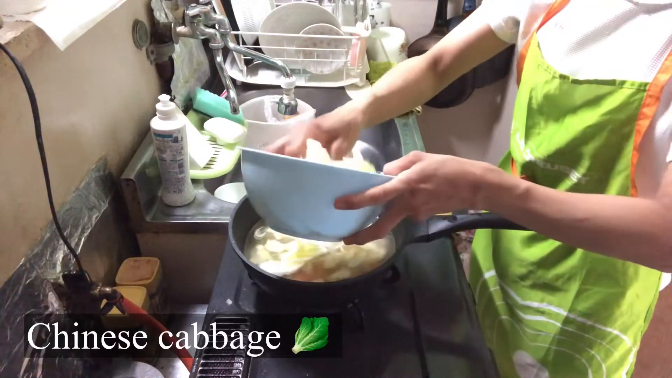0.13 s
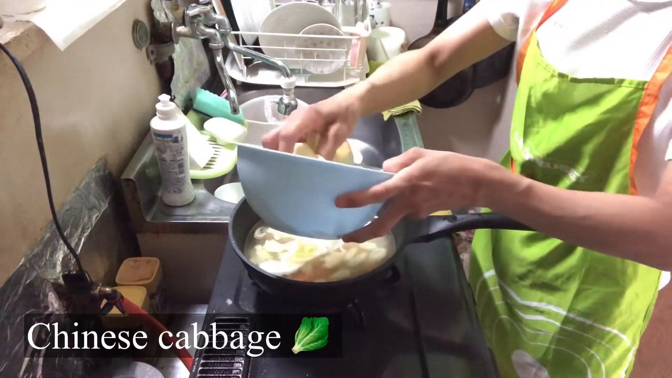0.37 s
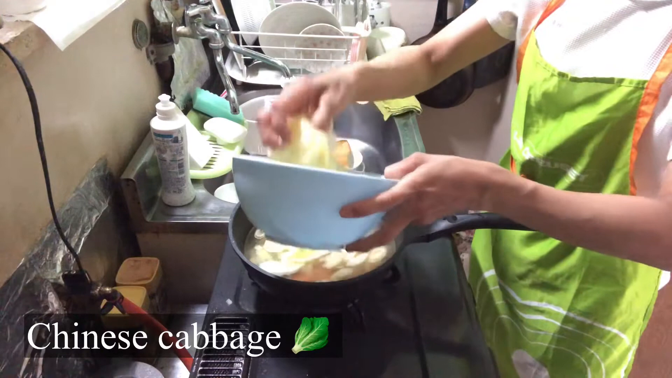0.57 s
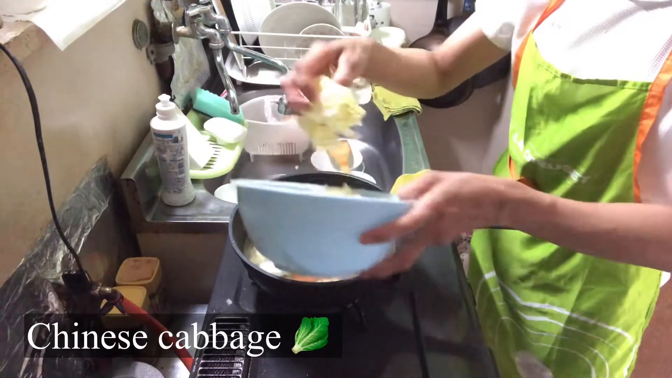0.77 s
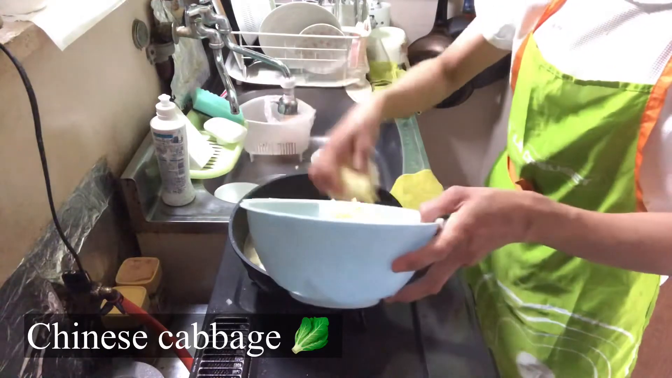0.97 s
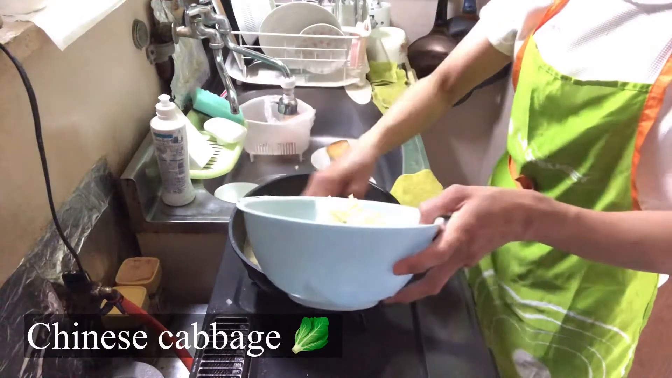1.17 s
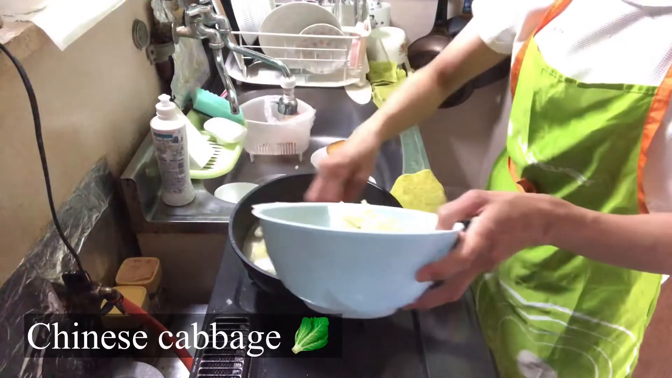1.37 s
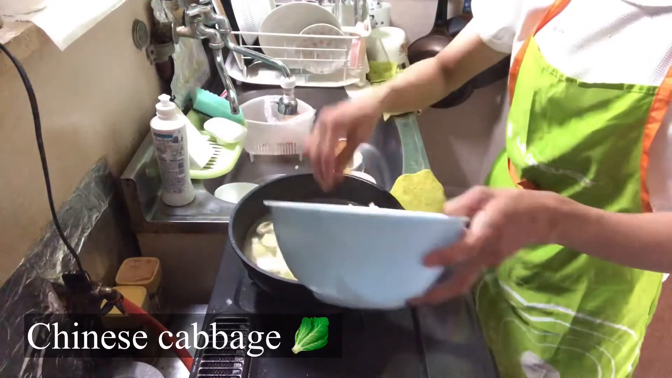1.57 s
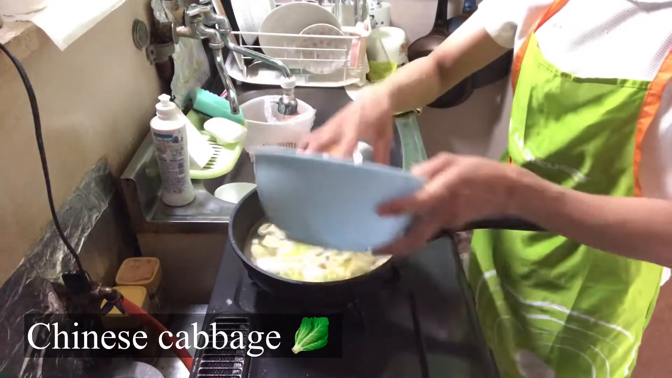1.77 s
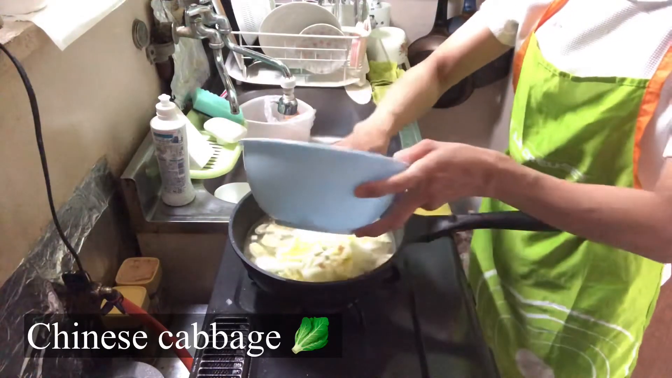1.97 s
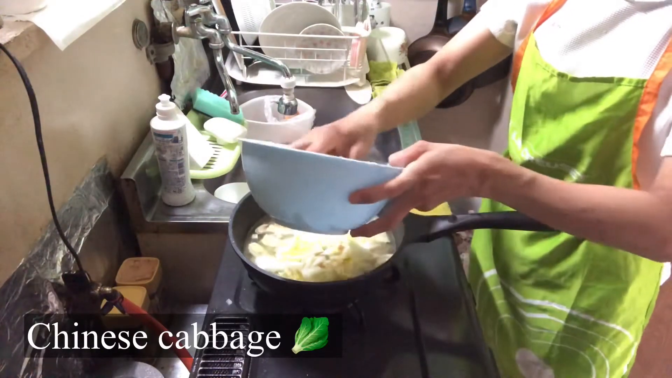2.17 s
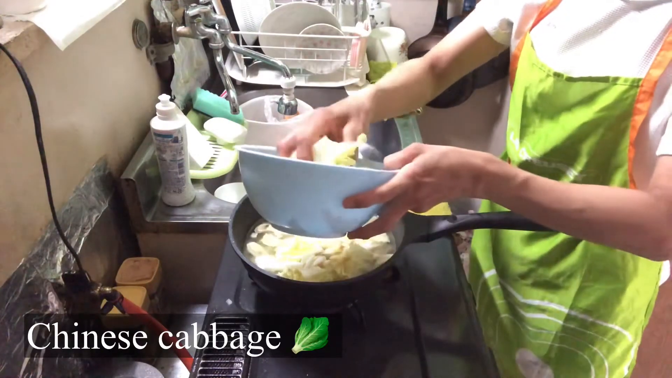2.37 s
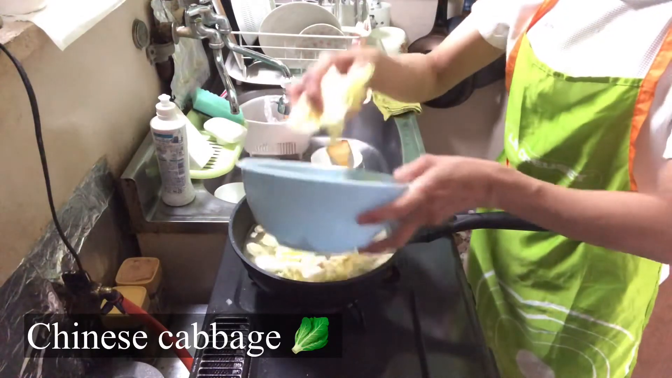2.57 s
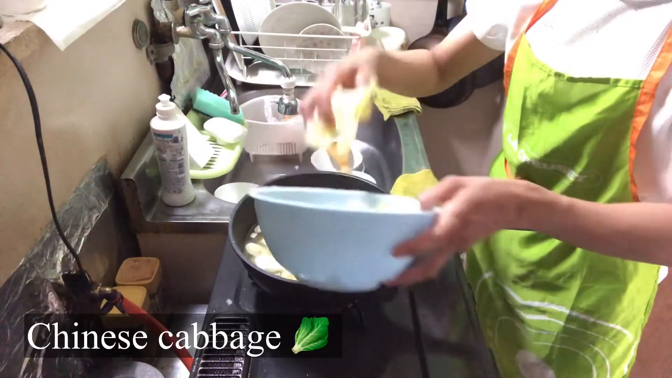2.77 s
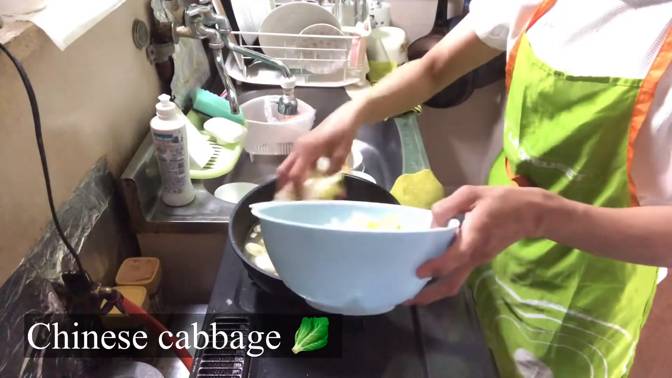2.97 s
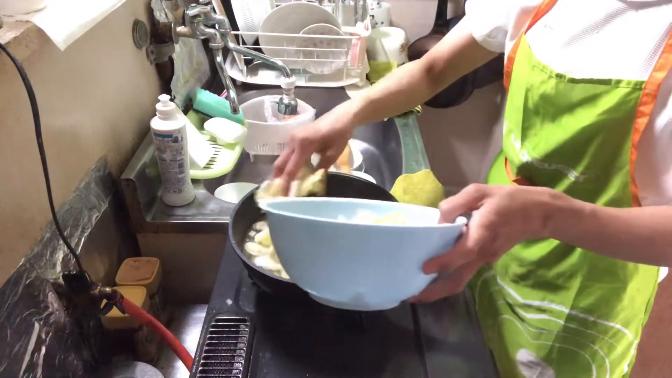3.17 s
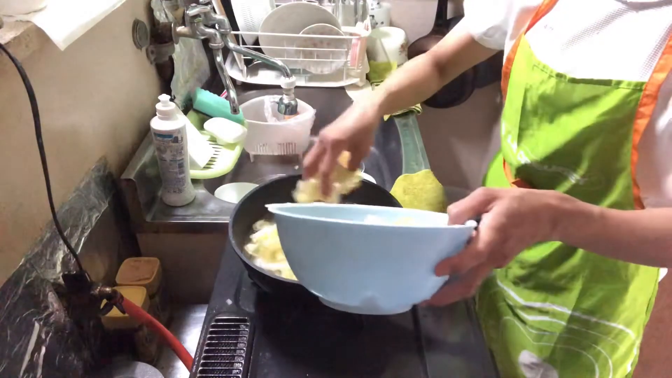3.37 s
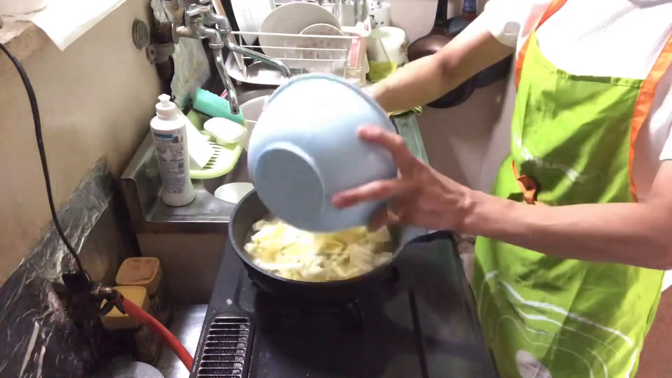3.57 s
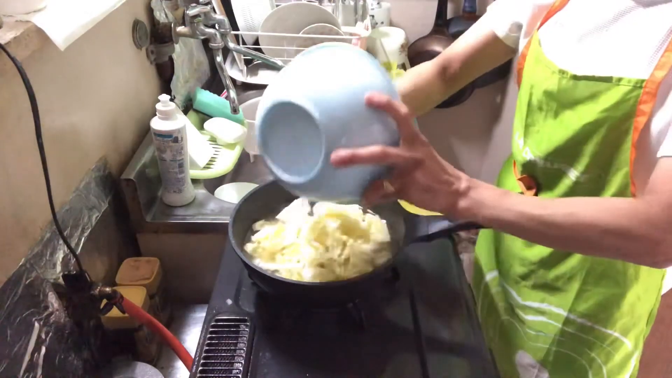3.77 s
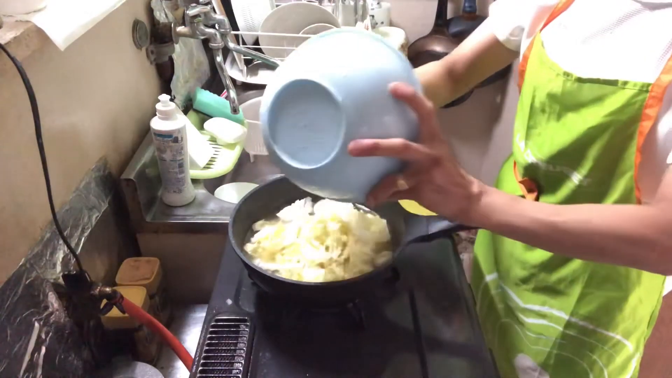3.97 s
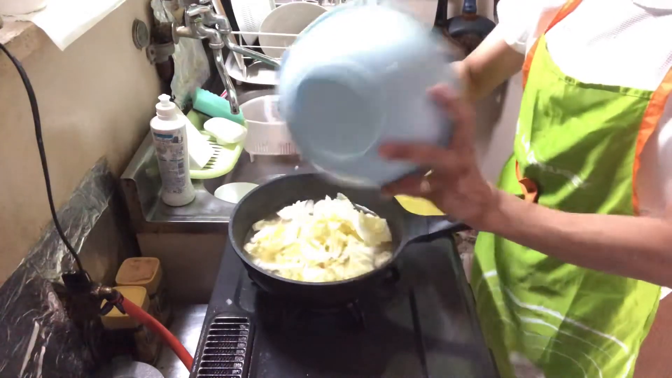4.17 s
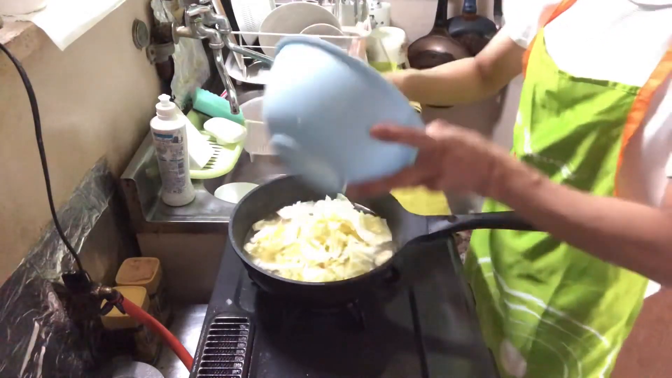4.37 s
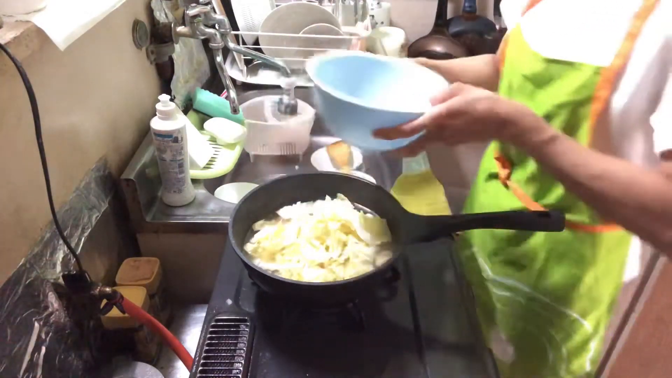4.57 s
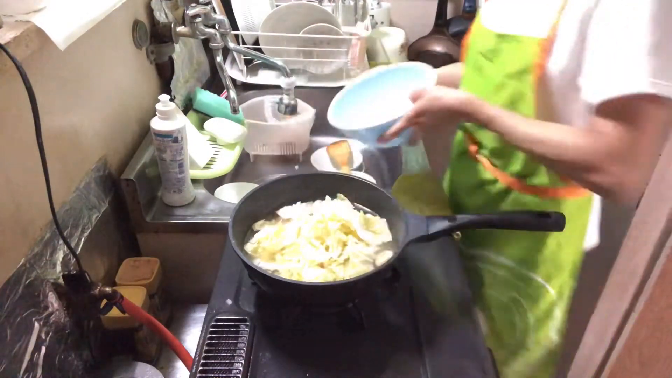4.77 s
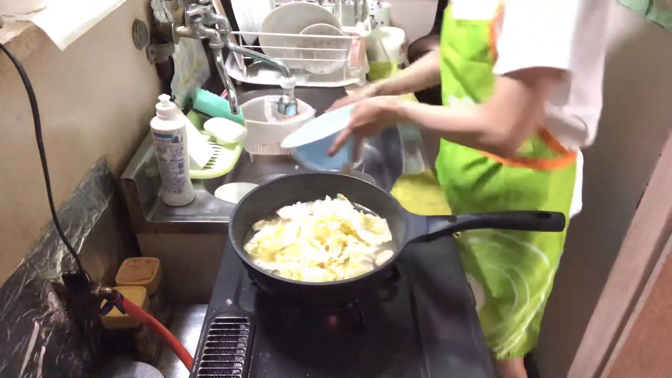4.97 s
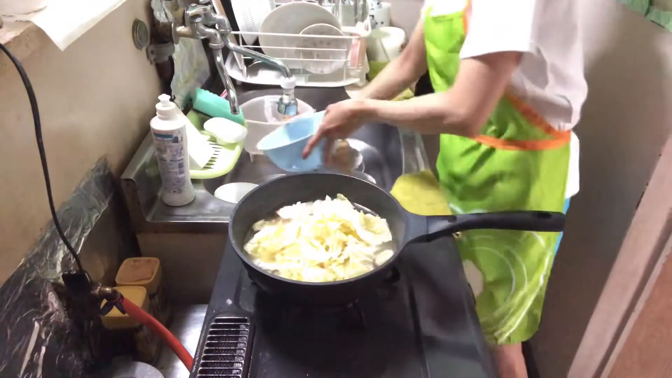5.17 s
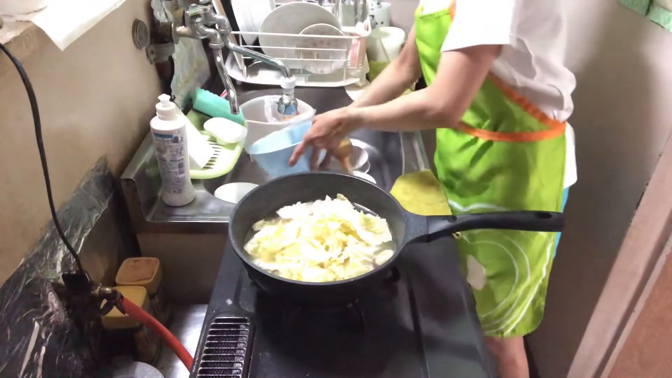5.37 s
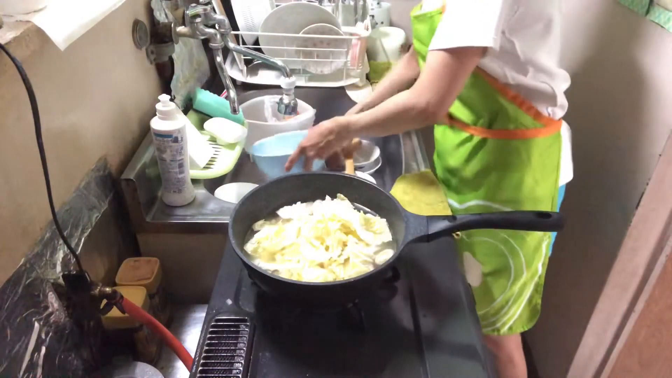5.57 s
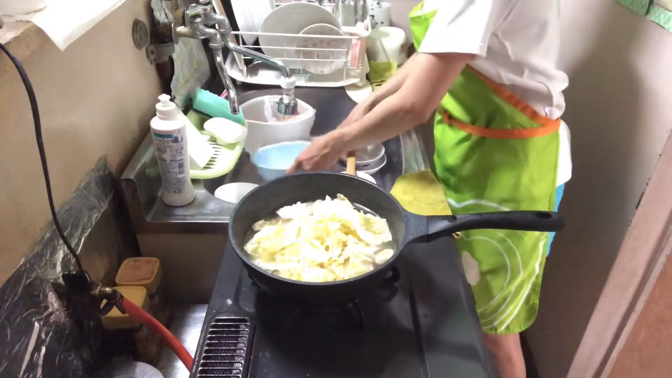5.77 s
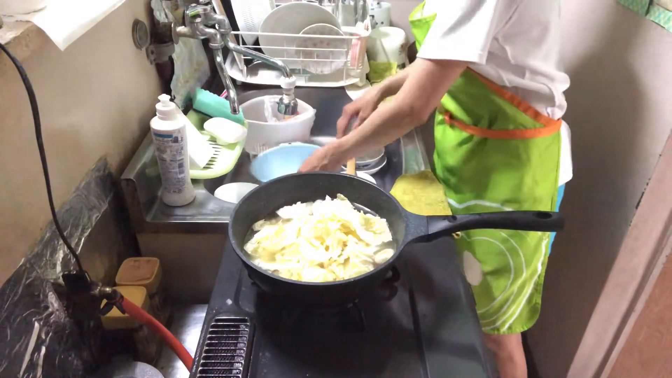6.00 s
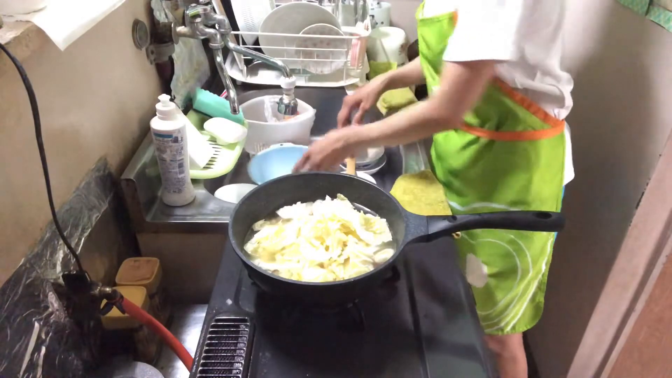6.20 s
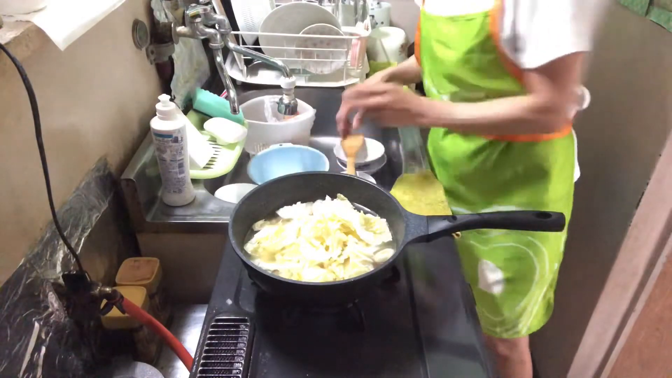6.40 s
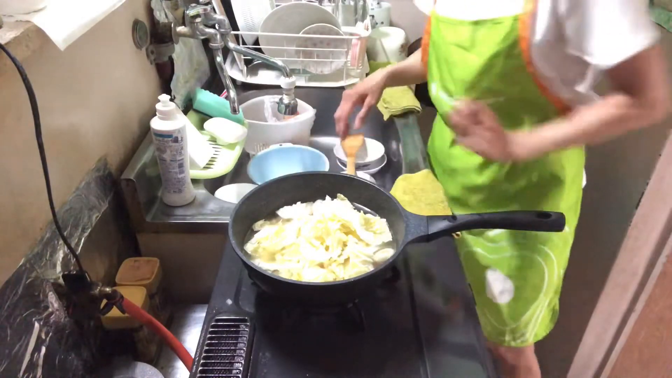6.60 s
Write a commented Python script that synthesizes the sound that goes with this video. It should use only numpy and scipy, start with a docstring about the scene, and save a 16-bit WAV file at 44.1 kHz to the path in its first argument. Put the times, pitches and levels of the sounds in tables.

```python
"""A hand moves chopped cabbage from a plastic bowl into a pan under a droning cooker hood.
Throughout, the hood is shaped noise and a wavering tone; the leaves are gritty noise grains and snaps,
with hollow modal taps on the bowl. At 3.6 s all sound drops out briefly and fades back in.
Then a glazed dish clinks as damped modes, the bowl slides as rough noise and is knocked down
into a steel sink, whose modes boom and rattle until they are stilled."""
import sys
import numpy as np
from scipy import signal
from scipy.fft import rfft, irfft
from scipy.io import wavfile
from scipy.ndimage import uniform_filter1d

SR = 44100
rng = np.random.default_rng(int(sys.argv[2]) if len(sys.argv) > 2 else 0)


def to_wav(sig):
    """Store sig (one row per channel, or 1-D mono) as 16-bit WAV at the path in sys.argv[1].

    Samples outside -1..1 are clipped; the rate is SR.
    """
    pcm = np.clip(np.atleast_2d(sig), -1, 1) * 32767
    pcm = np.round(pcm).astype(np.int16)
    wavfile.write(sys.argv[1], SR, pcm.T)  # frames by channels


N = 292824


def amp(db):
    """Level to amplitude: 20 dB is a factor of ten."""
    return 10 ** (np.asarray(db) / 20)


def evened(x):
    """Normalisation to unit rms."""
    return x / np.sqrt(np.mean(x ** 2) + 1e-20)


def read(points, hz):
    """Interpolation of a curve along logarithmic frequency."""
    f, value = np.transpose(points)
    return np.interp(np.log(hz + 1), np.log(f + 1), value)


def add(mix, s, sound):
    """Superposition of a sound on the mix from time s."""
    part = mix[round(s * SR):][:len(sound)]
    part += sound[:len(part)]


def coloured(x, points):
    """Spectral shaping: x filtered by a gain curve, to unit rms."""
    gain = amp(read(points, np.fft.rfftfreq(len(x), 1 / SR)))
    return evened(irfft(rfft(x) * gain, len(x)))


def band(x, hz, width):
    """Resonance: a band-pass peak applied twice."""
    b, a = signal.iirpeak(min(hz, .45 * SR), hz / width, SR)
    return signal.lfilter(b, a, signal.lfilter(b, a, x))


def gritty(count, per_s, spread_db, smooth):
    """Shot noise: sparse clicks of unequal size over a share of smooth noise."""
    size = amp(spread_db * np.minimum(rng.exponential(1, count), 4)) * rng.standard_normal(count)
    clicks = size * (rng.random(count) < per_s / SR)
    return evened(clicks) + smooth * rng.standard_normal(count)


def strokes(rows, rise_db, fall_db):
    """Exponential envelopes, summed: each rises, holds and falls at so many dB a second."""
    t = np.arange(N) / SR
    total = 0
    for s, hold, db in rows:
        before = np.maximum(s - t, 0)
        after = np.maximum(t - s - hold, 0)
        total = total + amp(db - rise_db * before - fall_db * after)
    return total


SPOT_DB, SPOT_OCTAVES = 8, 0.24  # lift of the modes near the favoured pitch of the place struck


def ring(modes, hardness_db, scatter_db, chatter_s, spot_hz=None, firm=5.7, detune=0.012):
    """Modal superposition: one blow sets off damped sines, the high ones weakly if it is soft."""
    hz, db, t60 = np.transpose(modes)[:, :, None]
    t = np.arange(SR // 2) / SR
    spot = rng.standard_normal((len(modes), 1))  # each blow lands on another spot
    lift_db = 0
    if spot_hz is not None:
        lift_db = SPOT_DB * np.exp(-(np.log2(hz / spot_hz) / SPOT_OCTAVES) ** 2)
    level_db = db + lift_db + hardness_db * np.log2(np.maximum(hz, 210.)) + scatter_db * spot
    swell = 1 - np.exp(-t * hz / 0.39)  # low modes swell slowly
    bent_hz = hz * (1 + detune * rng.standard_normal(hz.shape))
    tones = np.sin(2 * np.pi * bent_hz * t + 0.73 * spot)
    out = (swell * amp(level_db - 60 * t / t60) * tones).sum(0)
    bounces = rng.random(800) ** 8 * np.exp(-t[:800] / chatter_s)  # the contact chatters for a moment
    contact = np.diff(bounces, prepend=0) + firm * signal.unit_impulse(800)
    out = signal.oaconvolve(out, contact)[:len(t)]
    return out / abs(out).max()


# the hand grips, drops and spreads wet leaves: [start t/s, hold t/s, nominal level/dB, treble share/dB]
HAND_GRIPS = [(0, 0.15, -62.5, -7), (0.263, 0.023, -57, -6), (0.386, 0.018, -57.5, -2),
              (0.482, 0.13, -62, -5), (1.117, 0.07, -59, -2.5), (1.25, 0.051, -56, -2.5),
              (1.378, 0.012, -60.5, 3), (1.487, 0.076, -63, -2), (1.887, 0.072, -53.5, -7.5),
              (2.013, 0.053, -49.5, -5.5), (2.122, 0.076, -62, -2), (2.743, 0.056, -65.5, -10),
              (2.929, 0.16, -61, 1.5), (3.142, 0.053, -62, -5), (3.48, 0.017, -60, -4),
              (3.676, 0.02, -56, -1), (3.815, 0.084, -61, -4), (4, 0.012, -61.5, -7),
              (4.843, 0.009, -60, -4)]
GRIP_RISE_DB_PER_S, GRIP_FALL_DB_PER_S = 455, 175
# spectral weighting of the leaf grains: [f/Hz, gain/dB]
LEAF_COLOUR = [(880, -34), (1500, -7), (2130, -6.5), (3660, -2), (5420, -2), (8500, -7.5), (11000, -45)]


def leaves():
    """Granular friction: pitched grains in eight bands, with a fizz of noise above."""
    body_rows = [(s, hold, db) for s, hold, db, _ in HAND_GRIPS]
    treble_rows = [(s, hold, db + share) for s, hold, db, share in HAND_GRIPS]
    body = strokes(body_rows, GRIP_RISE_DB_PER_S, GRIP_FALL_DB_PER_S)
    treble = strokes(treble_rows, GRIP_RISE_DB_PER_S, GRIP_FALL_DB_PER_S)
    grains = 0
    for hz in np.geomspace(1800, 7500, num=8):
        grains = grains + evened(band(gritty(N, 500, 3.2, 0.74), hz, 0.38 * hz))
    fizz = coloured(gritty(N, 2500, 3.3, 1.0), [(6500, -7), (8500, -8.5), (15000, -13.5)])
    # wide ticks shared by all bands
    tick_power = uniform_filter1d(gritty(N, 70, 12.0, 0.056) ** 2, 160)
    ticks = amp(2.26 * tick_power ** 0.38 - 3.5)
    return ticks * (body * coloured(grains, LEAF_COLOUR) + treble * fizz)


# single snaps of leaf and stalk: [t/s, peak level/dB, centre f/Hz]
LEAF_SNAPS = [(0.0268, -45, 4200), (.099, -44.5, 4970), (.355, -38, 1610), (0.377, -37.5, 3900),
              (.535, -46, 2350), (1.105, -39, 6540), (1.1316, -40, 5000), (1.153, -40, 5500),
              (1.307, -39, 5500), (1.3853, -37.5, 7100), (1.51, -38, 6340), (1.673, -47, 11400),
              (1.851, -34.5, 5030), (1.869, -25, 2450), (2.388, -44.5, 3670), (2.8446, -40.5, 5160),
              (2.857, -44.5, 3470), (2.928, -37, 4170), (2.947, -50, 3500), (2.964, -38, 4070),
              (2.984, -45, 5500), (3.027, -39, 4100), (3.056, -37.5, 4530), (3.098, -45, 4500),
              (3.14, -47, 3300), (3.249, -43, 5440), (3.571, -43.5, 5100), (3.7082, -36.5, 3400),
              (3.7844, -34, 2680), (3.794, -43, 2900), (3.8061, -31.5, 3500), (3.812, -43, 2700),
              (3.819, -49, 3000), (3.8443, -40, 3600), (3.83, -42, 2700), (3.85, -41, 3800),
              (3.868, -30, 2200), (3.8692, -34, 1900), (3.878, -37, 3380), (3.893, -40, 2880),
              (4.0193, -36.5, 5540), (4.342, -46, 2940), (4.839, -42, 3560), (6.5937, -47, 11400)]
SNAP_T60_S = 0.07


def snaps():
    """Impulsive fracture: a click and decaying noise excite two broad resonances."""
    out = np.zeros(N)
    t = np.arange(6000) / SR
    for s, db, hz in LEAF_SNAPS:
        decay = amp(-60 * t / SNAP_T60_S) + 1.16 * np.exp(-t / 0.001)
        crack = rng.standard_normal(len(t)) * decay + 10. * signal.unit_impulse(len(t))
        snap = band(crack, hz, 0.78 * hz) + 0.18 * band(crack, 1.71 * hz, 0.28 * hz)
        snap += 0.022 * np.diff(crack, prepend=0)  # a trace of bright, unfiltered click
        add(out, s, amp(db) * snap / abs(snap).max())
    return out


# modes of the plastic bowl: [f/Hz, relative level/dB, t60/s]
BOWL_MODES = [(708, -6, 0.054), (796, 1, 0.027), (1370, -11.5, 0.18), (1454, 2.5, 0.024),
              (2220, 1.5, 0.022), (2555, -6, 0.025), (2990, -17, 0.017)]
# fingers and stalks tap the bowl: [t/s, peak level/dB, hardness/(dB per octave), favoured f/Hz]
BOWL_TAPS = [(.416, -39, -4, 790), (.477, -43, -7, 780), (1.8509, -24, 4.5, 770), (1.932, -35.5, -1, 760),
             (2.049, -33, -8, 715), (2.095, -33, -10, 1350), (5.783, -38.5, -1.5, 2300)]
# stalks rub the rim and keep one note singing: [start t/s, hold t/s, level/dB]
RIM_RUBS = [(2.05, .03, -52), (2.097, 0.04, -52)]
RUB_HZ = 1368
# the foot settles, then is dragged over wet steel: [start t/s, hold t/s, level/dB]
BOWL_SLIDES = [(5.4, 0.065, -57), (5.51, 0.26, -49.5), (5.62, 0.012, -51.5)]
SLIDE_RISE_DB_PER_S, SLIDE_FALL_DB_PER_S = 300, 332
# spectrum of the slide: [f/Hz, relative level per Hz/dB]
SLIDE_COLOUR = [(350, 0), (700, -1), (1140, 3), (2900, -5), (4500, -2), (5200, -6.5), (7800, -9.5),
                (8600, -17), (15500, -23)]


def bowl():
    """Modal response to taps, handling and rim friction, with broadband friction for the slide."""
    scrape = coloured(gritty(N, 6000, 1.7, 0.99), SLIDE_COLOUR)
    out = strokes(BOWL_SLIDES, SLIDE_RISE_DB_PER_S, SLIDE_FALL_DB_PER_S) * scrape
    # small knocks while leaves are handled
    grip_rows = [row[:3] for row in HAND_GRIPS]
    handled = strokes(grip_rows, GRIP_RISE_DB_PER_S, GRIP_FALL_DB_PER_S) * gritty(N, 250, 2.5, .3)
    knock = ring(BOWL_MODES, -0.5, 0.62, 0.0036)
    out += amp(-6) * signal.oaconvolve(handled, knock / np.linalg.norm(knock))[:N]
    note = evened(band(rng.standard_normal(N), RUB_HZ, 54.0))
    out += strokes(RIM_RUBS, GRIP_RISE_DB_PER_S, SLIDE_FALL_DB_PER_S) * note
    for s, db, hardness_db, spot_hz in BOWL_TAPS:
        add(out, s, amp(db) * ring(BOWL_MODES, hardness_db, 0.65, 0.0036, spot_hz))
    return out


# modes of the sink's sheet steel: [f/Hz, relative level/dB, t60/s]
SINK_MODES = [(71.3, -12, 0.36), (163, -11.5, 0.17), (204.4, -8.5, 0.52), (225, 1, 0.084),
              (260.6, -3.5, 0.16), (280.8, -4, 0.27), (392.7, -2.5, 0.13), (451, -7.5, 0.12),
              (579, -7.5, 0.077), (678, -12, 0.082), (736, -17, 0.1), (873, -5.5, 0.047),
              (930, -12.5, 0.068), (1110, -18, 0.075), (1270, -26, .08), (1453, -12, 0.061),
              (1580, -24, 0.078), (2300, -11, 0.041), (2680, -19.5, 0.02), (3720, -18, 0.022),
              (4700, -15, 0.015)]
# blows: [t/s, peak level of the ringing/dB, hardness/(dB per octave),
#         rattle level re ringing peak/dB, favoured f/Hz]
SINK_BLOWS = [(5.341, -32.5, -38, -10, 190), (5.9697, -17.5, 0.5, -26, 330), (5.9842, -19, -5, -29.5, 278),
              (6.066, -51, 13, 0.5, 2300), (6.135, -24, 0.5, -4.5, 2350), (6.145, -20.5, 1, -8, 700),
              (6.154, -20, 1, -13.5, 210), (6.174, -20, -7, -14.5, 273), (6.219, -31.5, -2, -8.5, 2300),
              (6.231, -19, -0.5, -20.5, 617), (6.27, -18, 6, -7.5, 2610), (6.273, -11.5, -4, -19, 218),
              (6.299, -26.5, 4.5, -8, 850), (6.314, -26.5, -5, -13.5, 383), (6.347, -25.5, -10, -26, 202)]
# spectrum of the rattle: [f/Hz, relative level per Hz/dB]
RATTLE_COLOUR = [(290, -15), (500, -2.5), (954, -4), (1040, -11), (1330, -4), (1960, -13), (2360, -9.5),
                 (15500, -38.5)]


def sink():
    """Plate vibration: each blow booms in the steel's modes and shakes what stands in it."""
    out = np.zeros(N)
    t = np.arange(SR // 2) / SR
    for s, db, hardness_db, rattle_db, spot_hz in SINK_BLOWS:
        rattle = coloured(gritty(len(t), 3000, 4.7, 1.9), RATTLE_COLOUR)
        rattle *= amp(rattle_db - 60 * t / 0.15)  # t60 of 0.15 s
        boom = ring(SINK_MODES, hardness_db, 1.0, 0.007, spot_hz, detune=.004)
        add(out, s, amp(db) * (boom + rattle))
    return out


# modes of the glazed dish: [f/Hz, relative level/dB, t60/s]
DISH_MODES = [(1470, -3.5, 0.093), (2430, 0.5, 0.085), (3390, 3, 0.035), (3340, -14.5, 0.9),
              (4105, 10, 0.068), (6065, 5, 0.088), (6850, 0, 0.028), (8317, -11, .06), (9216, -16, 0.2),
              (10840, -6, 0.04), (13300, -13, .04)]
# the dish is touched: [t/s, peak level/dB]
DISH_CLINKS = [(5.342, -33), (5.348, -29.5), (6.141, -32.5), (6.163, -43)]


def dish():
    """Modal ringing of a stiff body: firm contacts sound fixed, high pitches."""
    out = np.zeros(N)
    for s, db in DISH_CLINKS:
        add(out, s, amp(db) * ring(DISH_MODES, 0, 0.78, 0.002, firm=12., detune=0))
    return out


STILLED_S, STILLED_DB_PER_S = 6.49, 500


def stilled(x):
    """Added damping: the hand comes to rest and the ringing stops."""
    return x * amp(-STILLED_DB_PER_S * np.maximum(np.arange(N) / SR - STILLED_S, 0))


# the motor's drone wavers: [t/s, level/dB]
DRONE_LEVEL = [(0, -51), (.9, -47.5), (1.1, -54), (1.7, -50.5), (2.1, -54), (3.3, -60.5), (3.9, -49),
               (4.6, -57.5), (5.2, -48), (6.64, -53.5)]
DRONE_HZ, LATER_DRONE_HZ = 180.8, 178.7  # a little lower once the dropout begins
DROPOUT_S = 3.584


def motor_drone():
    """Frequency modulation: a sine whose pitch flutters slowly and whose level wavers."""
    s, drone_db = np.transpose(DRONE_LEVEL)
    t = np.arange(N) / SR
    flutter = evened(uniform_filter1d(uniform_filter1d(rng.standard_normal(N), 2000), 2000))
    hz = np.where(t < DROPOUT_S, DRONE_HZ, LATER_DRONE_HZ) + 1.36 * flutter  # flutter 1.36 Hz rms
    tone = np.sqrt(2) * np.sin(2 * np.pi * np.cumsum(hz) / SR)
    return amp(np.interp(t, s, drone_db)) * tone


# fuzzy tones of the fan: [f/Hz, width of one resonance pass/Hz, level/dB]
FAN_TONES = [(116.8, 24.3, -55), (265.8, 11.5, -70), (358.5, 11, -60), (520.7, 35, -63), (969, 86, -69.5),
             (1259, 30, -69)]


def fan_tones():
    """Narrow-band noise: resonances driven by random noise give fuzzy pitches."""
    total = 0
    for hz, width, db in FAN_TONES:
        total = total + amp(db) * evened(band(rng.standard_normal(N), hz, width))
    return total


# spectrum of the air rush: [f/Hz, relative level per Hz/dB]
AIR_COLOUR = [(28, -50), (50, -10.5), (75, -16), (180, -4), (231, -11), (269, -9.5), (382, -13), (529, -19),
              (646, -23.5), (1240, -21), (2260, -33), (2770, -31.5), (16000, -52.5)]
AIR_DB = -49.5  # rms level


def air_rush():
    """Turbulence noise: random spectra whose level drifts in patches of time and frequency."""
    frames = N // 256 + 5
    a, b, patches = rng.standard_normal((frames, 513, 3)).T
    patches = evened(uniform_filter1d(uniform_filter1d(patches, 10, 0), 12, 1))
    spectra = (a + 1j * b) * amp(1.82 * patches)  # patches vary by 1.82 dB rms
    noise = signal.istft(spectra, nperseg=1024, noverlap=768)[1][:N]
    return amp(AIR_DB) * coloured(noise, AIR_COLOUR)


def hood():
    """Superposition of the hood's air rush, fan tones and motor drone."""
    return air_rush() + fan_tones() + motor_drone()


# decay of the kitchen: [f/Hz, t60/s]
ROOM_DECAY = [(200, 0.42), (1000, 0.34), (4000, 0.18), (12000, 0.1)]


def kitchen(x):
    """Reverberation: sparse echoes of random sign, each band dying at its own speed."""
    taps = np.zeros(SR // 2)
    at = np.arange(200, len(taps) - 20, 20)
    taps[at + rng.integers(0, 20, len(at))] = rng.choice([-1., 1.], len(at))
    hz, t, spectra = signal.stft(taps, SR, nperseg=256)
    decay = amp(-60 * t / read(ROOM_DECAY, hz)[:, None])
    tail = signal.istft(spectra * decay, SR, nperseg=256)[1]
    return signal.fftconvolve(x, tail / np.linalg.norm(tail))[:N]


def scene():
    """Superposition of the near sources, their reverberation and the hood."""
    near = leaves() + snaps() + bowl() + stilled(sink() + dish())
    return (near + amp(-11.5) * kitchen(near) + hood())[None]


SILENT_S, FADE_IN_S, FADE_BEND, SILENCE_DB = 0.025, 0.17, 1.1, -37  # near silence, then a fade-in
EDGE_HZ = 15850  # upper band limit


def record(dry):
    """Band limiting: the microphone drops the deepest bass and the top; the level dips briefly between."""
    t = np.arange(N) / SR - DROPOUT_S
    fade = np.clip((t - SILENT_S) / FADE_IN_S, 0, 1) ** FADE_BEND
    gain = np.where(t < 0, 1, np.maximum(fade, amp(SILENCE_DB)))
    faded = signal.lfilter(*signal.butter(2, 36., "high", fs=SR), dry) * gain
    low_pass = signal.firwin(511, EDGE_HZ, window=("kaiser", 9), fs=SR)
    return signal.oaconvolve(faded, low_pass[None], "same")


dry = scene()
out = record(dry)
to_wav(out)
```